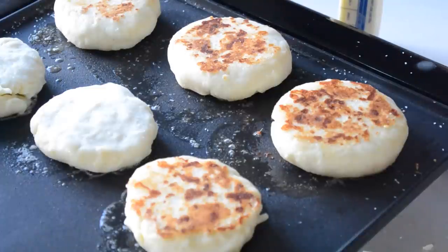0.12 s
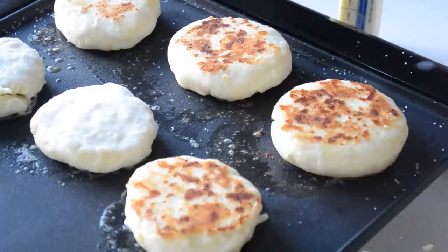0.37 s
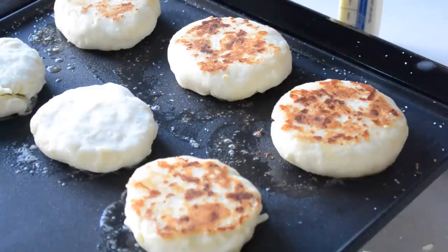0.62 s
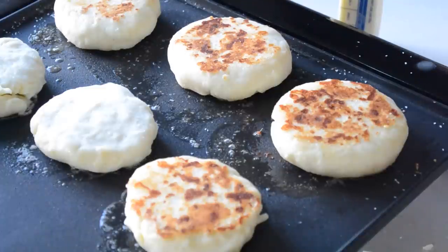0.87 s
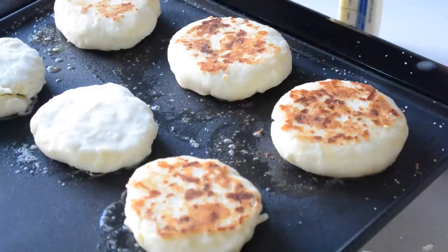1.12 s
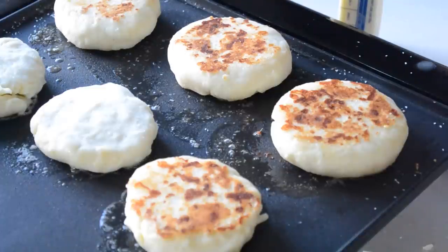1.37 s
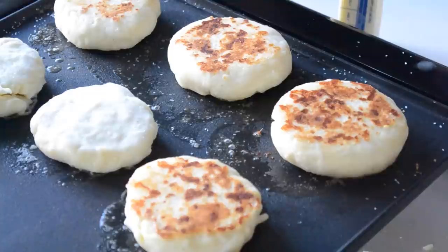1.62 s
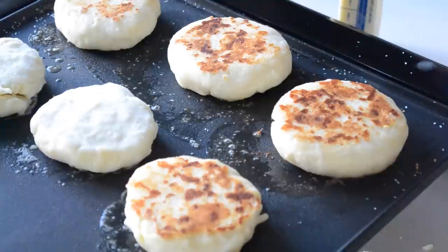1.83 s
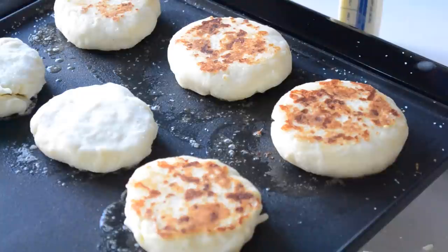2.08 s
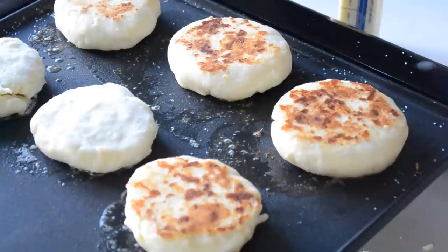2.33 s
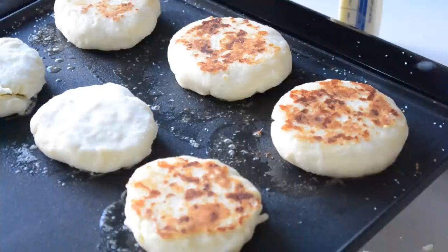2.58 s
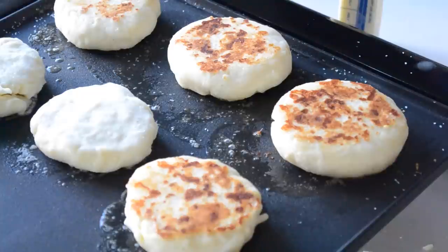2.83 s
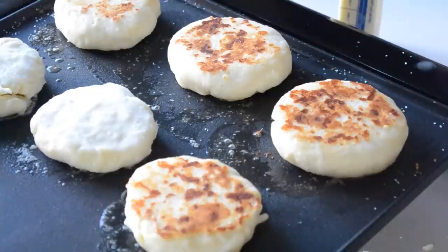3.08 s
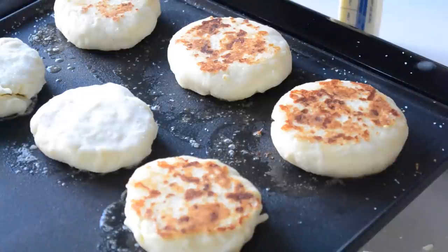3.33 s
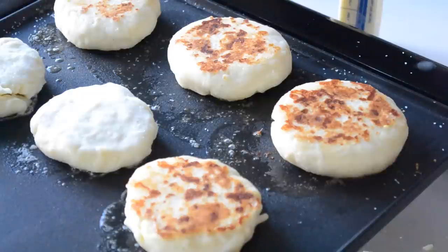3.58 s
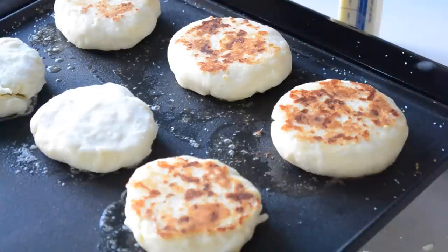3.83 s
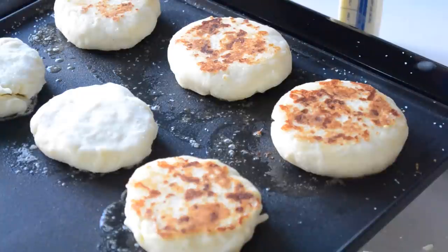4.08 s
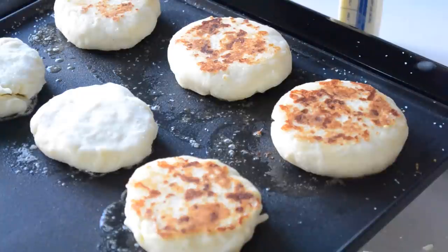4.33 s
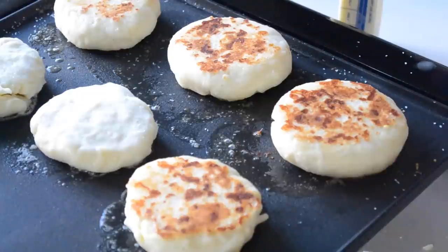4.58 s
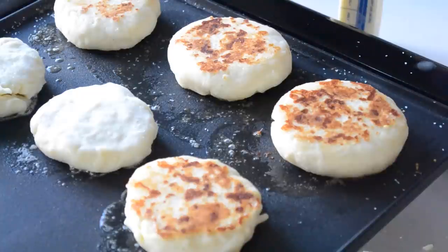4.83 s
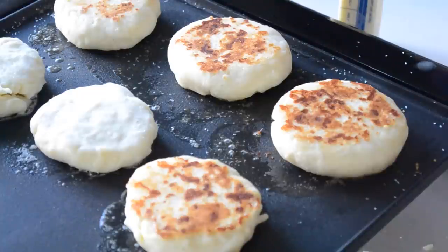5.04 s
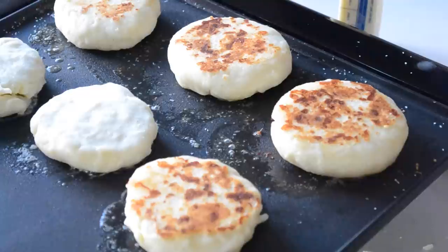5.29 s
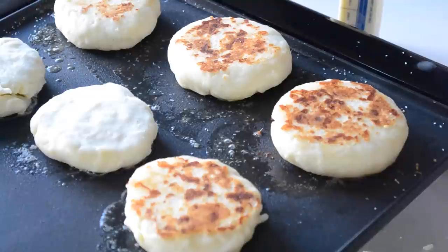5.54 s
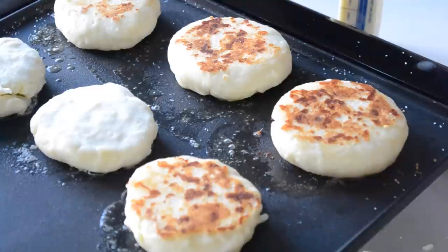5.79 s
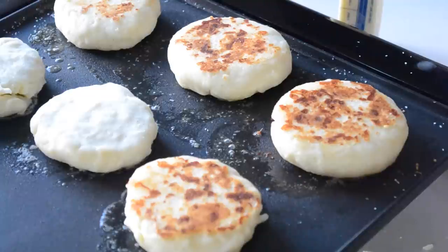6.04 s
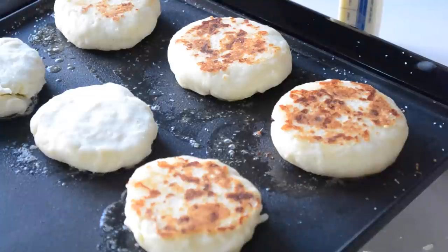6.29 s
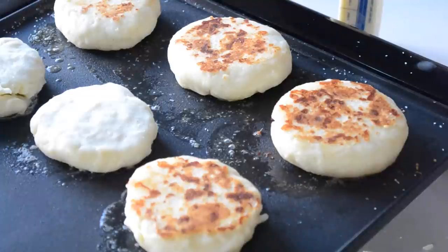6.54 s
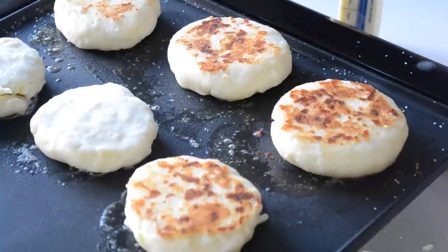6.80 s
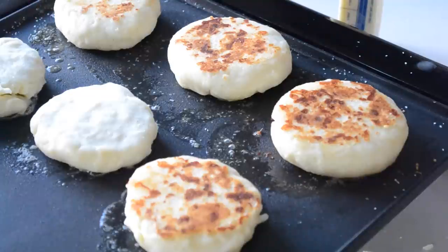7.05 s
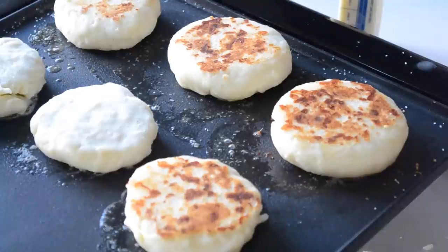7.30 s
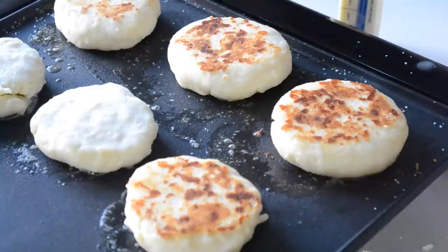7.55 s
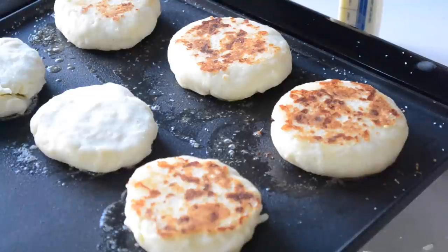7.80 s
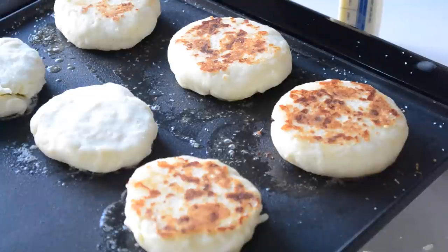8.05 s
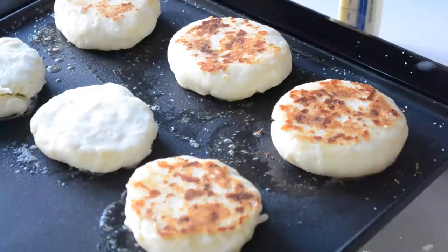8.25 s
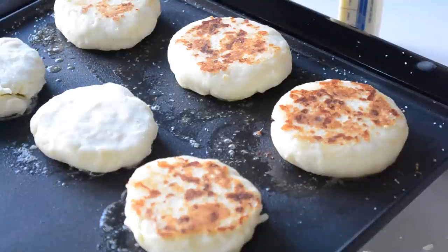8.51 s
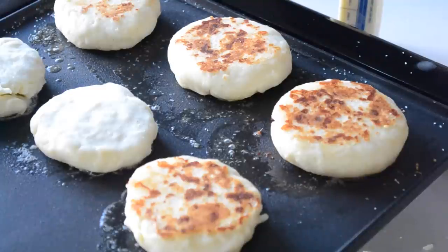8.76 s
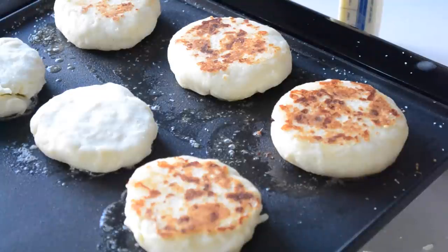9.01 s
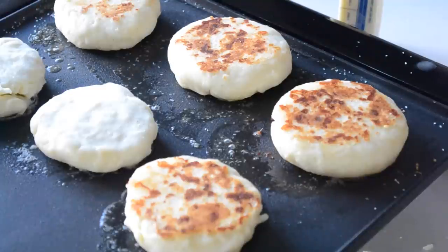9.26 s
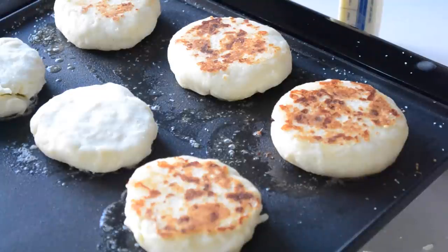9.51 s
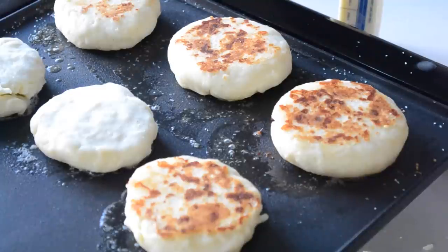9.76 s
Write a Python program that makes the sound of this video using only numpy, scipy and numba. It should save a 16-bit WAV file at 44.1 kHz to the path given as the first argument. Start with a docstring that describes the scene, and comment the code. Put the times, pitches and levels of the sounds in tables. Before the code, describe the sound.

Dough cakes frying in butter on a flat griddle, close up: bright dense sizzle, sharp dry crackles, occasional wet plops, faint knocks near the end.

```python
"""Dough cakes fry in butter on a flat griddle in a small kitchen, heard from close by.
From the start, steam bubbles burst as short damped swings, from a dense fizz to lone pops, over a low
noise hush; a faint damped tone dies away. Wet plops, gliding up in pitch, come from about 1 s on, with
muffled modal thumps near the first; dull modal knocks on the counter come near the end.
Early echoes and a diffuse tail enclose the bursts, plops, thumps and knocks."""
import sys
import numpy as np
from scipy import signal
from scipy.fft import rfft, irfft
from scipy.io import wavfile
from scipy.ndimage import uniform_filter1d
from numba import njit

SR = 44100
rng = np.random.default_rng(int(sys.argv[2]) if len(sys.argv) > 2 else 0)


def unload_wav(signal):
    """Save mono or channel-first audio to the path in sys.argv[1] as 16-bit WAV at rate SR, clipped to [-1, 1]."""
    wavfile.write(
        sys.argv[1],
        SR,
        np.round(np.clip(np.atleast_2d(signal).T, -1, 1) * 32767).astype(np.int16),
    )


def field_ratio(decibels):
    """Amplitude ratio for a level in dB (20 dB per decade); scalars and array-likes work."""
    return 10 ** (np.asarray(decibels, dtype=float) / 20)


N = 435708  # samples, 9.88 s
SPOTS = 6  # places on the plate, each with its own path through the room


def colour(x, points):
    """Minimum-phase filtering: the folded cepstrum of a log gain gives a causal response."""
    size = 4096
    hz, db = np.transpose(points)
    log_hz = np.log(np.arange(size // 2 + 1) * SR / size + 1)
    log_gain = np.log(field_ratio(np.interp(log_hz, np.log(hz), db)))
    cepstrum = irfft(log_gain)
    # fold the second half onto the first to make the response causal
    cepstrum[1:size // 2] *= 2
    cepstrum[size // 2 + 1:] = 0
    response = irfft(np.exp(rfft(cepstrum)))
    return signal.fftconvolve(x, response)[:N]


@njit
def grains(count, at, size, hz, cycles, glide):
    """Damped oscillation: each swing falls by 1/e in the given cycles and may glide in pitch."""
    out = np.zeros(count)
    for k in range(len(at)):
        first = int(at[k]) + 1
        log_pole = (2j * np.pi - 1 / cycles[k]) * hz[k] / SR
        # the onset may lie between two samples
        z = size[k] * np.exp(log_pole * (first - at[k]))
        steps = int(6 * cycles[k] * SR / hz[k])
        for n in range(first, min(first + steps, count)):
            out[n] += z.imag
            stretch = 1 + glide * (n - first) / steps
            z *= np.exp(log_pole.real + 1j * log_pole.imag * stretch)
    return out


def kitchen(x, room_db):
    """Room acoustics: direct sound, discrete early echoes and an exponentially decaying diffuse tail."""
    # early echoes from plate, food and wall: (delay [ms], level [dB], sign [+1 or -1])
    echoes = [(.4, -27.5, 1), (.7, -51, -1), (1.05, -32.5, 1), (1.703, -33, -1), (6.8, -19, 1),
              (10.15, -22, 1)]
    t60_s = 0.32
    t = np.arange(SR // 2) / SR
    build_up = np.clip(t * 1000 / 1.86 - 1, .3, 1)  # full from 3.72 ms
    tail = rng.standard_normal(len(t)) * field_ratio(-60 * t / t60_s) * build_up
    # room_db is the tail's energy relative to the direct sound
    response = field_ratio(room_db) * tail / np.sqrt(np.sum(tail ** 2))
    response[0] += 1
    for ms, db, sign in echoes:
        response[int(ms * SR / 1000)] += np.sign(sign) * field_ratio(db)
    return signal.oaconvolve(x, response)[:N]


def hush():
    """Stationary noise: a random signal shaped to the low spectrum of the room."""
    # relative spectral density of the hush: (frequency [Hz], level [dB per Hz])
    spectrum = [(30, -3.5), (120, -2.5), (250, 0), (500, -4), (1000, -10), (2000, -12), (5000, -27)]
    noise = colour(rng.standard_normal(N), spectrum)
    return field_ratio(-56.5) * noise / noise.std()


def walk(rate):
    """Slow random modulation: levels held 1 / rate s and slewed twice, spread near 1."""
    k = int(SR / rate)
    held = np.repeat(rng.standard_normal(N // k + 1), k)
    slewed = uniform_filter1d(uniform_filter1d(held, k), k)
    return 1.75 * slewed[:N]


def bursts(count, db, spread_db, top_db, centre_hz, octaves, cycles):
    """Random bubble bursting: many small and few large bubbles at random times, some ringing longer."""
    when, big, pitch, open_ = rng.random((count, 4)).T
    # levels are exponentially spread above db, at most by top_db
    size = field_ratio(db + np.minimum(-spread_db * np.log(1 - big), top_db))
    hz = np.clip(centre_hz * 2 ** (octaves * (2 * pitch - 1)), 300, 12000)
    turns = cycles * 2 ** (1.07 * open_ ** 2)
    # a longer ring starts weaker
    size = size * np.sqrt(cycles / turns)
    return grains(N, when * N, -size, hz, turns, 0.)


def fizz():
    """Superposed random bursts at one spot: the boil sets their level and slow modulation their flurries."""
    # how hard the fat boils: (time [s], base level of the bursts [dB])
    boil_points = [(0.0, -49), (0.38, -51.5), (2.64, -50), (3.05, -52.5), (3.55, -50), (3.85, -51.5),
                   (4.95, -49), (5.36, -51), (5.94, -48.5), (6.3, -51.5), (6.49, -50), (7.62, -50),
                   (7.87, -51), (9.88, -50)]
    s, db = np.transpose(boil_points)
    boil = field_ratio(np.interp(np.arange(N) / SR, s, db))
    # burst levels are in dB over the boil
    fine = bursts(count=6000, db=.5, spread_db=4.0, top_db=15.0, centre_hz=6500, octaves=1.0, cycles=0.29)
    crackle = bursts(count=700, db=6, spread_db=10.5, top_db=7.5, centre_hz=6000, octaves=0.94, cycles=0.39)
    spits = bursts(count=110, db=17, spread_db=3.0, top_db=5.5, centre_hz=5600, octaves=0.71, cycles=0.42)
    chirps = bursts(count=40, db=11.5, spread_db=3.0, top_db=4, centre_hz=5600, octaves=0.1, cycles=1.34)
    flurrying_fine = fine * field_ratio(2.35 * walk(25))
    flurrying_spits = (spits + chirps) * field_ratio(1.4 * walk(8))
    return boil * (flurrying_fine + crackle + flurrying_spits)


def pops(spot):
    """Strongly damped bubble oscillation: the loud bursts of one spot, suction first."""
    # the loudest bursts: (time [s], source level [dB], bubble pitch [Hz], decay to 1/e [cycles])
    loud_bursts = [(0.0098, -20, 6100, 0.5), (0.0362, -24, 8500, 0.29), (0.1206, -22, 6600, 0.45),
                   (0.135, -16, 4700, 0.34), (0.1695, -21, 5100, 0.35), (0.2017, -20.0, 6900, 0.25),
                   (0.2307, -27, 6900, 0.6), (0.3554, -32, 6300, 0.4), (0.4737, -32, 5200, 0.3),
                   (0.5519, -20, 7200, 0.25), (0.5904, -22, 6600, 0.46), (0.7254, -27, 5800, 0.6),
                   (0.7398, -20.5, 5500, 0.72), (0.7602, -20, 7640, 0.5), (0.7855, -28, 6800, 0.56),
                   (0.8054, -21.5, 5270, 0.4), (0.9128, -26, 5400, 1), (0.9254, -26, 3600, 0.19),
                   (0.9844, -23, 4080, 0.36), (1.1345, -22.5, 6900, 0.45), (1.1425, -27.5, 8600, 1.2),
                   (1.2446, -25, 4700, 0.36), (1.2854, -26, 5400, 1), (1.3424, -21, 6100, 0.3),
                   (1.4713, -22, 9300, 0.29), (1.5579, -24.5, 5470, 0.4), (1.5608, -22.5, 5300, 0.89),
                   (1.5968, -23, 7100, 0.6), (1.761, -17.5, 3640, 0.36), (1.7873, -21, 3400, 0.35),
                   (1.9705, -31, 5400, 1.7), (2.0924, -24, 8400, 0.57), (2.1446, -20.5, 7760, 0.6),
                   (2.2985, -28.0, 7700, 1.1), (2.4348, -28, 6400, 0.45), (2.4878, -24, 6500, 0.4),
                   (2.5782, -23.5, 5660, 1.1), (2.6441, -32, 7700, 1.2), (2.7039, -28, 5100, 0.4),
                   (2.8039, -21, 4620, 0.43), (2.9154, -24, 5900, 0.45), (2.9984, -25.5, 7300, 0.6),
                   (3.0522, -29, 6900, 0.6), (3.1661, -23, 5200, 0.74), (3.1804, -23, 7500, 0.65),
                   (3.2212, -29.5, 8300, 1.7), (3.3456, -24.0, 5700, 0.35), (3.3665, -21.0, 5600, 0.27),
                   (3.4309, -28, 5500, 1.4), (3.5, -29, 4900, 0.4), (3.5561, -28, 7400, 0.7),
                   (3.6048, -24, 6400, 0.35), (3.6311, -21, 6840, 0.37), (3.659, -21.5, 7700, 0.46),
                   (3.7258, -26, 5840, 0.5), (3.7463, -27, 5200, 0.5), (3.8056, -28, 5430, 1.2),
                   (3.9309, -20.5, 5940, 0.35), (3.9673, -26, 7500, 0.6), (4.0116, -21.0, 6300, 0.28),
                   (4.1061, -26.0, 5700, 1.4), (4.1102, -18, 5760, 0.32), (4.1137, -21, 5470, 1.3),
                   (4.1458, -12.5, 6100, 0.46), (4.1727, -22, 5600, 1.2), (4.339, -15.5, 7000, 0.48),
                   (4.3717, -19.5, 6000, 0.4), (4.4889, -25, 4900, 0.45), (4.496, -24, 5300, 0.5),
                   (4.5246, -20, 5930, 0.35), (4.6555, -21, 3200, 0.23), (4.6644, -18, 4400, 0.2),
                   (4.6982, -16.5, 5000, 0.45), (4.7201, -16, 5800, 0.27), (4.7285, -5.5, 5950, 0.43),
                   (4.8107, -25, 6100, 0.45), (4.9238, -20, 5900, 0.45), (4.9539, -18.5, 6100, 0.25),
                   (4.9812, -19.5, 5500, 0.3), (5.0895, -25.5, 6900, 0.54), (5.1369, -16.5, 6500, 0.27),
                   (5.1559, -20, 5800, 0.37), (5.2301, -23, 6600, 0.47), (5.2667, -18, 6600, 0.35),
                   (5.2716, -14.5, 5300, 0.3), (5.3466, -22, 6900, 0.56), (5.3958, -17.5, 5600, 0.92),
                   (5.5192, -24, 4200, 0.4), (5.5357, -16.5, 5900, 0.34), (5.5484, -20, 4100, 0.4),
                   (5.5523, -21, 7000, 0.6), (5.5684, -23, 5400, 0.45), (5.5976, -16.5, 3600, 0.24),
                   (5.6402, -19, 6300, 0.4), (5.6996, -20.5, 6700, 0.43), (5.737, -23, 5000, 0.35),
                   (5.7483, -25.5, 5400, 1.4), (5.8742, -19, 4900, 0.25), (5.9057, -22, 5700, 0.42),
                   (5.9447, -27, 8250, 0.68), (5.9606, -21.0, 5300, 0.35), (6.0116, -16.0, 5900, 0.5),
                   (6.0153, -18.5, 5700, 0.4), (6.0842, -17.0, 6800, 0.3), (6.0965, -13.5, 5200, 0.2),
                   (6.1201, -26, 6500, 0.5), (6.2405, -22.5, 6700, 0.45), (6.2525, -22, 6100, 0.44),
                   (6.2854, -22.5, 6200, 0.8), (6.304, -19.5, 5700, 0.22), (6.4385, -25, 6200, 0.4),
                   (6.4442, -15, 5900, 0.23), (6.5116, -23.5, 6600, 0.45), (6.5182, -12, 6100, 0.24),
                   (6.579, -19.5, 6560, 0.45), (6.6209, -18, 6000, 0.27), (6.6452, -26, 4800, 0.6),
                   (6.6559, -25, 6500, 0.45), (6.6626, -23, 5900, 0.3), (6.7021, -22, 5000, 0.3),
                   (6.7175, -15, 5500, 0.3), (6.7566, -19, 6800, 0.4), (6.7712, -24.0, 7400, 0.8),
                   (6.85, -19, 6200, 0.25), (6.8639, -24, 6000, 0.5), (6.9418, -18, 4800, 0.25),
                   (6.9535, -12, 4600, 0.19), (7.0338, -18, 5500, 0.55), (7.0493, -18.0, 5300, 0.35),
                   (7.0997, -27, 5900, 0.6), (7.1837, -25, 5000, 0.5), (7.1913, -21, 7900, 0.3),
                   (7.1982, -24, 5900, 1.2), (7.219, -18, 4600, 0.23), (7.2531, -24.5, 7100, 0.5),
                   (7.3344, -19.5, 6000, 0.4), (7.3762, -20.0, 4670, 0.45), (7.4154, -14, 7800, 0.29),
                   (7.4926, -20.5, 5500, 0.35), (7.5374, -28, 7200, 1.2), (7.5577, -12, 5750, 0.36),
                   (7.6391, -21.5, 5700, 0.3), (7.6526, -21.5, 6200, 0.5), (7.6727, -16.0, 4600, 0.28),
                   (7.7161, -21.5, 5400, 0.45), (7.8542, -17, 4600, 0.5), (7.932, -16, 7150, 0.43),
                   (8.1016, -21, 7560, 0.65), (8.1318, -21.0, 5800, 0.28), (8.314, -9, 7300, 0.22),
                   (8.3337, -18, 3300, 0.25), (8.3413, -17, 7100, 0.25), (8.3731, -20.5, 6800, 0.35),
                   (8.3858, -20.5, 9500, 0.45), (8.3889, -16, 9500, 0.45), (8.4341, -22, 5500, 0.3),
                   (8.5143, -22.5, 7100, 0.6), (8.6451, -24, 7400, 0.4), (8.6513, -16.5, 7800, 0.46),
                   (8.6645, -20, 4900, 0.3), (8.691, -12.5, 6000, 0.2), (8.7323, -24, 4400, 0.56),
                   (8.7351, -18, 7100, 0.39), (8.8502, -19, 6650, 0.4), (9.0693, -34, 6000, 0.35),
                   (9.2173, -18.5, 6800, 0.27), (9.2218, -24, 4800, 0.9), (9.3129, -26, 5800, 1.7),
                   (9.3823, -26, 7700, 0.68), (9.4762, -18, 4530, 0.21), (9.4969, -18, 6500, 0.25),
                   (9.5033, -28, 5200, 0.39), (9.5692, -27, 5400, 0.27), (9.5751, -24, 5200, 0.3),
                   (9.58, -28, 4400, 0.38), (9.6203, -19.5, 4500, 0.23), (9.6341, -19.5, 7200, 0.25),
                   (9.6435, -23.5, 5900, 0.8), (9.8079, -25, 5500, 0.45), (9.8369, -23.5, 3800, 0.43)]
    s, db, hz, cycles = np.transpose(loud_bursts[spot::SPOTS])
    onset = s * SR - 1.2 * SR / hz  # the listed time lies 1.2 cycles after the onset
    return grains(N, onset, -field_ratio(db), 1. * hz, 1. * cycles, 0.)


def sizzle():
    """Small-source radiation: bursts from all spots, weak in bass, each spot with its own room path."""
    spread = sum(kitchen(fizz() + pops(spot), room_db=-10) for spot in range(SPOTS))
    return signal.lfilter(*signal.butter(2, 1200, "high", fs=SR), spread)


def ring():
    """Lightly damped oscillation: one faint tone dies away at the start."""
    onset_s, level_db, pitch_hz, decay_cycles = .006, -50, 625, 30
    s, db, hz, cycles = np.transpose([(onset_s, level_db, pitch_hz, decay_cycles)])
    return grains(N, s * SR, field_ratio(db), hz, cycles, 0.)


def plops():
    """Bubble resonance: big bubbles tear with a crack, then ring, rising in pitch as they open."""
    # larger bubbles: (onset [s], level before damping [dB], starting pitch [Hz], decay to 1/e [cycles])
    big_bubbles = [(.925, -34, 1120, 1), (2.2031, -30.5, 1250, 0.82), (6.09, -35.5, 1200, 1.1),
                   (7.184, -45, 1150, 5), (7.189, -44, 1280, 7), (7.253, -51, 1300, 3.5),
                   (7.584, -38, 1290, 1.6), (8.589, -40, 900, 0.9), (8.596, -40.5, 503, 1.3)]
    crack_db, crack_hz = 3.5, 3000  # the film tears; dB over the ring
    s, db, hz, cycles = np.transpose(big_bubbles)
    crack = grains(N, s * SR, -field_ratio(db + crack_db), crack_hz + 0 * s, 0.47 + 0 * s, 0.)
    return crack + grains(N, s * SR, field_ratio(db), hz, cycles, 0.23)


def blows(rows, modes, low_hz):
    """Modal excitation: a short push rings the modes; a softer push is longer and duller."""
    push = np.zeros(N)
    for s, db, soft_ms in rows:
        shape = np.hanning(int(soft_ms * SR / 1000) + 3)
        push[int(s * SR):][:len(shape)] += field_ratio(db) * shape / shape.sum()
    hz, db, t60 = np.transpose(modes)
    # neighbouring modes swing opposite ways
    size = field_ratio(db) * (-1) ** np.arange(len(hz))
    modal_ring = grains(SR // 2, 0 * hz, size, hz, t60 * hz / np.log(1000), 0.)
    # little radiates below the lowest mode
    high_pass = signal.butter(4, low_hz, "high", fs=SR, output="sos")
    return signal.sosfilt(high_pass, signal.fftconvolve(push, modal_ring)[:N])


def thumps():
    """Structure-borne sound: soft blows further off in the house ring low modes."""
    # muffled blows: (time [s], strength [dB], softness [ms])
    far_blows = [(.946, -40, 1.8), (.972, -48, 1.4), (1.002, -50, 1.6), (1.03, -48, 1.1),
                 (1.093, -48, 0.89), (1.14, -61, 1)]
    # what the structure rings with: (frequency [Hz], level [dB], decay by 60 dB [s])
    structure = [(75, -2.5, 0.056), (131, -1, 0.061), (250, -4, .03), (368, 0.5, 0.026), (517, -2.5, 0.023),
                 (694, -3, 0.022)]
    return blows(far_blows, structure, low_hz=50)


def knocks():
    """Impact sound: something set down on the counter rings its modes."""
    # contacts with the counter: (time [s], strength [dB], softness [ms])
    contacts = [(9.6993, -33.5, 0.23), (9.7045, -45.5, .15), (9.8437, -39.5, 0.28)]
    # what the counter rings with: (frequency [Hz], level [dB], decay by 60 dB [s])
    counter = [(340, 3.5, 0.028), (563, -2.5, 0.025), (910, -1.5, 0.015), (1400, -8, 0.017),
               (1690, -7, 0.02), (2220, -1, 0.016), (2880, -4, 0.014)]
    return blows(contacts, counter, low_hz=198)


def scene():
    """Superposition: the sources add, those further off with more sound by way of the walls."""
    mix = hush() + sizzle() + ring()
    mix = mix + kitchen(plops(), room_db=-1.5)
    mix = mix + kitchen(thumps(), room_db=6)
    mix = mix + kitchen(knocks(), room_db=-0.5)
    return mix[None]


def low_pass(x):
    """Removes everything above the highest recorded frequency."""
    return signal.sosfilt(signal.butter(12, 11600, fs=SR, output="sos"), x)


def record(dry):
    """Linear filtering: little bass, bright treble, a narrow dip near 7.9 kHz, a steep cutoff above 11 kHz."""
    # overall colour of the sound: (frequency [Hz], gain [dB])
    overall_colour = [(18, -55), (30, -28.5), (124, -18.5), (236, -16), (1110, -4), (1320, -3),
                      (2220, -2.5), (2840, -0.5), (5850, 3.5), (7320, 6), (7880, 0), (8710, 8.5),
                      (9620, 9.5), (10600, 2.5), (11400, -33), (11900, -60), (14900, -76), (22000, -120)]
    mix = colour(dry[0], overall_colour)[None]
    return low_pass(mix)


dry = scene()
out = record(dry)
unload_wav(out)
```